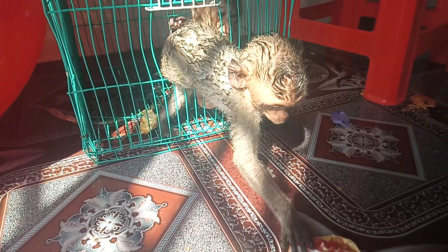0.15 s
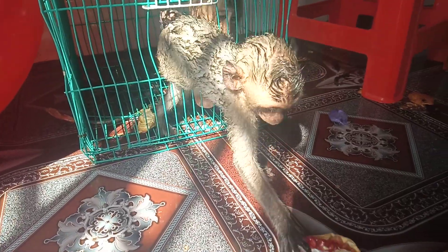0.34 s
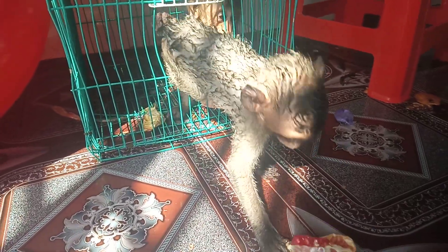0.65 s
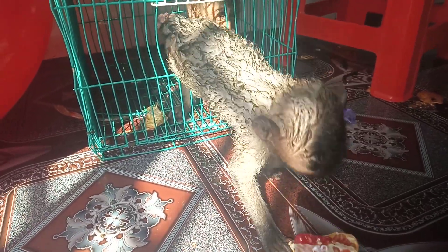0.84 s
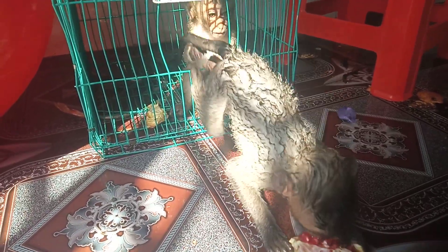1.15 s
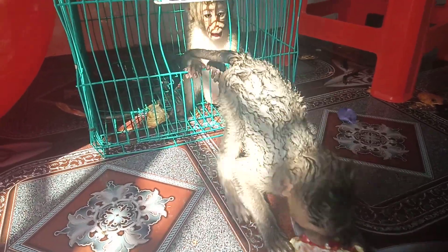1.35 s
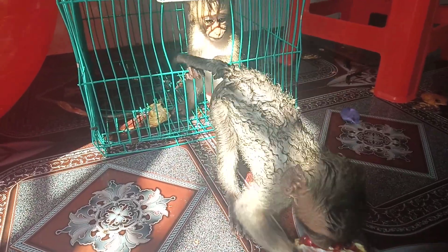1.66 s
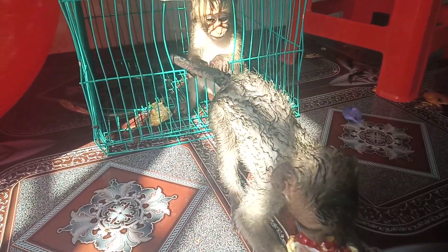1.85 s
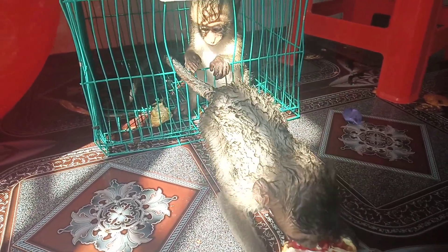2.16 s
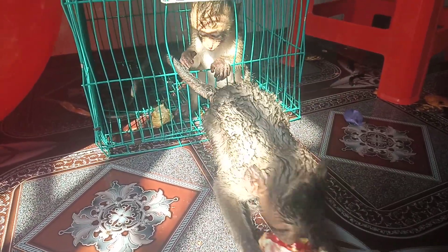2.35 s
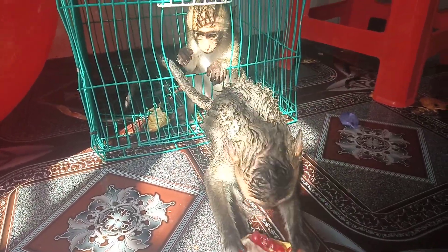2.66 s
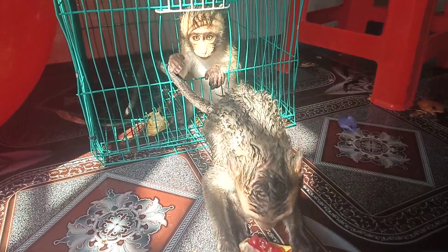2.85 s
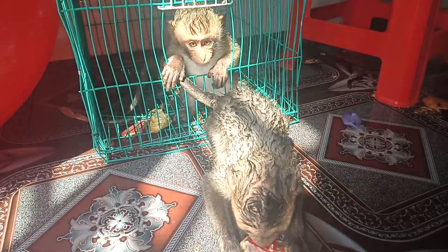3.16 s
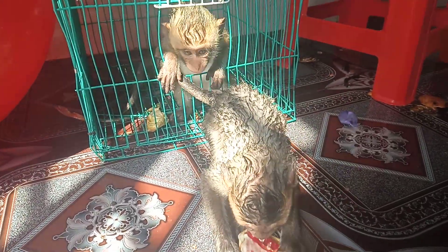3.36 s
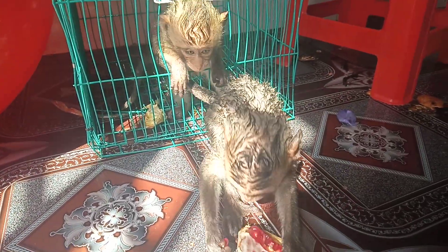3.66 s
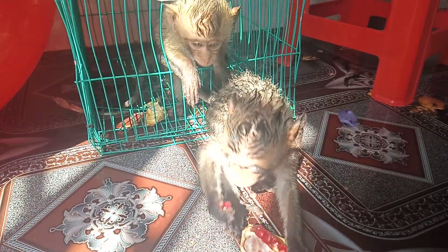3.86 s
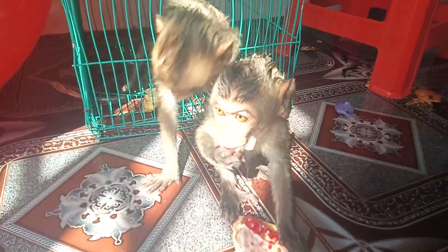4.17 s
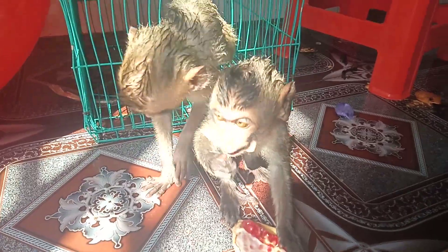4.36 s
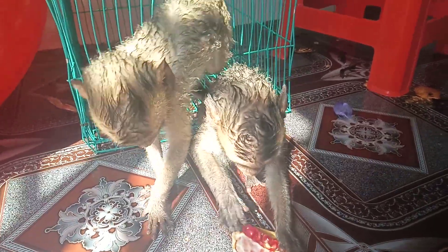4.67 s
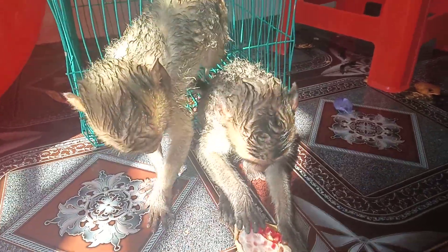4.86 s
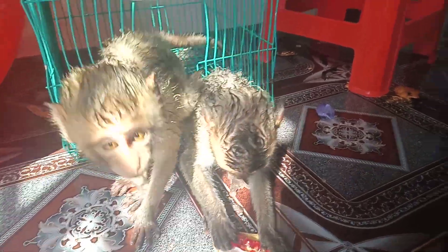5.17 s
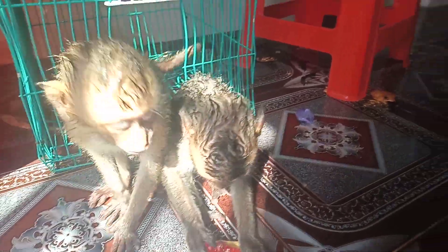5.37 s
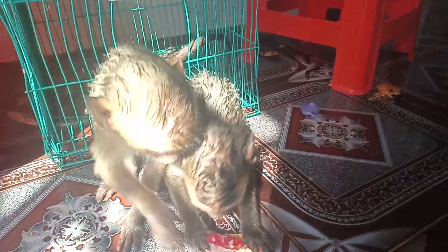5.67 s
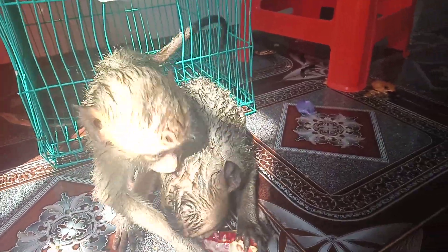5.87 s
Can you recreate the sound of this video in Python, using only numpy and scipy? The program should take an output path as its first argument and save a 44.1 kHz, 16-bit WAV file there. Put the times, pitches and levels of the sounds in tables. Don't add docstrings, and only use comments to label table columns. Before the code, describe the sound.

Close to a phone microphone in a hard tiled room, a young monkey's falling coo is already under way, then a call glides up and breaks into a loud whistled screech with echoes. Two softer coos follow with long pauses. Late on come two low hoarse yaps farther away, a thin whistle and a small knock. Faint claw and wire ticks and street hiss run underneath.

```python
import sys
import numpy as np
from scipy import signal
from scipy.fft import rfft, irfft, next_fast_len
from scipy.io import wavfile
from scipy.ndimage import uniform_filter1d, map_coordinates

SR = 44100
rng = np.random.default_rng(int(sys.argv[2]) if len(sys.argv) > 2 else 0)


def voltage_ratio(decibels):
    exponent = np.asarray(decibels, float) / 20
    return 10 ** exponent


def inscribe(sig):
    pcm = np.round(np.clip(np.atleast_2d(sig).T, -1, 1) * 32767)
    wavfile.write(sys.argv[1], SR, pcm.astype(np.int16))


N = 265041


def unit(x):
    return x / np.sqrt(np.mean(x ** 2) + 1e-20)


def along(points, hz):
    f, v = np.transpose(points)
    return np.interp(np.log(hz + 1), np.log(f + 1), v)


def wobble(n, rate):
    knots = rng.standard_normal(int(n * rate / SR) + 4)
    return map_coordinates(knots, [np.arange(n) * rate / SR])


def noise(spectrum):
    m = next_fast_len(N + 8192)
    gain = voltage_ratio(along(spectrum, np.fft.rfftfreq(m, 1 / SR)))
    return unit(irfft(rfft(rng.standard_normal(m)) * gain, m)[:N])


def surge(s, db, rise, fall):
    t = np.arange(N) / SR - s
    return db + np.where(t < 0, rise * t, -fall * t)


# first in seconds, last in seconds, spacing in seconds, depth in dB, half width in seconds.
CATCHES = [(.018, .018, 1, -12, .006), (.052, .135, .0207, -9, .0045), (1.146, 1.164, .018, -9, .003),
           (1.313, 1.322, .0042, -15, .0012), (2.449, 2.449, 1, -7, .004),
           (2.466, 2.564, .0325, -15, .0053), (3.515, 3.578, .063, -4, .0055), (4.515, 4.515, 1, -20, .009),
           (4.572, 4.66, .088, -9, .008)]


def voice(notes, tones, mouth, jitter, flutter_db, fade, count):
    out = np.zeros(N)
    catches = []
    for start, stop, every, depth_db, half in CATCHES:
        catches += [(at, depth_db, half) for at in np.arange(start, stop + every / 2, every)]
    for rows, (second_db, second_follows, third_db, third_follows, fourth_db) in zip(notes, tones):
        s, *cols = np.transpose(rows)
        begin = round(s[0] * SR)
        t = np.arange(begin, round(s[-1] * SR)) / SR
        hz, first, edge = (np.interp(t, s, c) for c in cols)
        first = first + sum(db * np.exp(-((t - at) / half) ** 2) for at, db, half in catches)
        sharper = edge - edge.mean()
        second = second_db + second_follows * sharper + along(mouth, 2 * hz)
        third = third_db + third_follows * sharper + along(mouth, 3 * hz)
        turns = np.cumsum(hz * (1 + jitter * wobble(len(t), 64.0))) / SR
        since = t - s[0] + (s[0] == 0)
        edges = np.clip(np.minimum(since, s[-1] - t) / fade, 0, 1)
        for k in range(1, count + 1):
            if k <= 3:
                db = (first, second, third)[k - 1]
            else:
                db = edge + along(mouth, k * hz) + (k == 4) * fourth_db
            drift_db = flutter_db * np.sqrt(k) * wobble(len(t), 23)
            breath = 1 + (k > 3) * .4 * wobble(len(t), 900)
            heard = voltage_ratio(db + drift_db) * breath * (k * hz < 15700)
            swing = np.sqrt(2) * np.sin(2 * np.pi * (k * turns + rng.random()))
            out[begin:][:len(t)] += edges * heard * swing
    return out


# time in seconds, pitch in Hz, loudness in dB,
# edge in dB (how sharply the vocal folds close).
COOS = [
    [(0, 820, -39.5, -61.5), (.03, 815.4, -32, -65.5), (.06, 790.5, -34, -69), (.09, 751, -40, -69),
     (.125, 741.5, -41, -76.5), (.15, 751, -32, -78)],
    [(2.415, 725, -41, -68), (2.43, 804, -35.5, -62), (2.458, 862, -31.5, -58.5),
     (2.5, 850.4, -34.5, -60.5), (2.548, 887, -31.5, -54.5), (2.585, 864, -38.5, -58),
     (2.615, 877.3, -36, -58), (2.635, 870, -42.5, -66), (2.668, 875, -36.5, -59.5)],
    [(3.425, 824, -41, -59.5), (3.445, 887, -32, -63.5), (3.48, 887, -31.5, -59.5),
     (3.515, 891.6, -30, -68.5), (3.54, 902.6, -27.5, -57), (3.595, 897, -34, -58.5),
     (3.655, 923.3, -31.5, -57), (3.675, 937.7, -43, -56), (3.708, 917, -33.5, -61)],
]
# second's mean in dB, its slope in dB per dB,
# third's mean in dB, its slope in dB per dB, lift of the fourth in dB.
COO_TONES = [(-44.5, 0.4, -51.5, 0.9, 3), (-46, -0.5, -48, 0.5, -4), (-49.5, 1.6, -43.5, 0, 2.5)]
# frequency in Hz, gain in dB.
THROAT = [(1500, 0), (3700, 0), (4500, -3), (5300, -15), (6300, -26), (7300, -31), (8350, -24), (9000, -35),
          (9900, -43), (11200, -34), (11700, -38), (12500, -54), (15000, -56)]


def coos():
    return voice(COOS, COO_TONES, THROAT, jitter=.002, flutter_db=.9, fade=.005, count=18)


# time in seconds, pitch in Hz, loudness in dB, edge in dB.
GLIDE = [
    [(1.083, 885, -40, -64), (1.1, 905, -26.5, -56), (1.122, 925, -24, -52), (1.148, 958, -29, -46),
     (1.17, 1045, -28, -47), (1.185, 1165, -30, -48), (1.2, 1315, -26, -42), (1.217, 1565, -22, -34),
     (1.234, 1750, -29, -32)],
]
# second in dB, dB per dB, third in dB, dB per dB, fourth's lift in dB.
GLIDE_TONES = [(-40.5, 0.33, -50, .2, 1)]
# frequency in Hz, gain in dB.
OPENING = [(1950, 0), (2330, 9), (2700, 0), (3500, 0), (3950, 5), (4600, -2), (5000, -20), (5500, -30),
           (6800, -17), (7500, -24), (8500, -31), (9800, -46), (11300, -46), (12600, -60), (14800, -38)]


def glide():
    return voice(GLIDE, GLIDE_TONES, OPENING, jitter=.002, flutter_db=.9, fade=.003, count=16)


# time in seconds, pitch in Hz, loudness in dB, edge in dB.
SCREECH = [
    [(1.233, 1850, -28, -58), (1.242, 2380, -25, -61), (1.254, 2520, -29, -65)],
    [(1.263, 2700, -22, -80), (1.285, 2650, -17, -80), (1.307, 2680, -23, -80)],
    [(1.309, 2800, -28, -45), (1.316, 2890, -24, -43), (1.325, 2830, -18, -46), (1.332, 2750, -26, -48)],
    [(1.336, 2700, -27, -75), (1.349, 2850, -23, -75)],
]
# second in dB, dB per dB, third in dB, dB per dB, fourth's lift in dB.
SCREECH_TONES = [(-56, 0, -48, 1.2, 0), (-62, 0, -64, 0, 0), (-38, 1.5, -45, 0, -3), (-58, 0, -58, 0, 0)]
SHRIEK = [
    [(1.348, 3050, -22, -45), (1.358, 2920, -15, -44), (1.363, 2910, -21, -50), (1.371, 3030, -11, -42),
     (1.375, 3050, -12, -32), (1.3785, 3080, -5.2, -27), (1.3825, 3080, -15, -30)],
    [(1.38, 2620, -15, -20), (1.39, 2380, -15, -24), (1.401, 2180, -18, -25)],
    [(1.402, 2100, -28, -53), (1.424, 1900, -33, -58)],
]
SHRIEK_TONES = [(-32.5, .2, -28, .25, 0), (-28, 4, -24, 1.9, 0), (-50, .8, -36, .9, 0)]
# frequency in Hz, gain in dB.
GAPE = [(3600, 0), (4700, -6), (5500, -26), (6800, -14), (8300, -22), (10000, -36), (11400, -24),
        (12600, -45), (14500, -30), (15500, -26)]


def screech():
    return voice(SCREECH, SCREECH_TONES, GAPE, jitter=.002, flutter_db=.3, fade=.002, count=7)


def shriek():
    return voice(SHRIEK, SHRIEK_TONES, GAPE, jitter=.002, flutter_db=.3, fade=.0016, count=7)


# frequency in Hz, level in dB per Hz.
RASP_COLOUR = [(2060, -38.5), (3500, 5), (4460, 8.5), (5280, -16.5), (6860, -16.5), (8910, 1.5),
               (10200, -42), (11100, -30), (12400, -33), (13900, -1.5), (15500, -22.5)]


def rasp():
    crack_s, hold_s = 1.38, .02
    burst_db = surge(crack_s, -35.5, 11000, 280)
    release_db = surge(crack_s + hold_s, 0, 0, 2200)
    return voltage_ratio(burst_db + release_db) * noise(RASP_COLOUR)


# time in seconds, pitch in Hz, loudness in dB, edge in dB.
YAPS = [
    [(4.8, 513, -42, -61), (4.82, 473.3, -43.5, -61), (4.845, 471.5, -39.5, -66.5), (4.9, 489, -55, -80)],
    [(4.918, 536, -41, -58), (4.93, 515.5, -35, -59.5), (4.945, 522, -46, -55.5), (4.957, 540, -36, -69),
     (4.966, 604, -44, -65)],
]
# second in dB, dB per dB, third in dB, dB per dB, fourth's lift in dB.
YAP_TONES = [(-50.5, 1.13, -55, .45, 0), (-41, 1, -57, -.2, 0)]


def far_yaps():
    yaps = voice(YAPS, YAP_TONES, THROAT, jitter=.02, flutter_db=1.2, fade=.007, count=4)
    return yaps * (1 + .3 * wobble(N, 300) + .12 * wobble(N, 5000))


# start in seconds, length in seconds, first pitch in Hz, last pitch in Hz, peak in dB.
FAR_TONES = [
    (4.46, 0.34, 1930, 1925, -50.5),
    (.14, 0.1, 468, 476, -55),
    (.29, .14, 463, 500, -55),
]


def far_tones():
    crest, swell_db, fade_db = 0.44, 7, 10.5
    notes = []
    for s, length, a, b, db in FAR_TONES:
        peak = (s + crest * length, (a + b) / 2, db, 0)
        notes.append([(s, a, db - swell_db, 0), peak, (s + length, b, db - fade_db, 0)])
    no_overtones = np.zeros((len(notes), 5))
    pure = voice(notes, no_overtones, THROAT, jitter=0.0045, flutter_db=2, fade=.01, count=1)
    return pure * (1 + 0.26 * wobble(N, 60))


# start in seconds, peak in dB, pitch in Hz.
TICKS = [(0.2635, -61, 6380), (0.2887, -60, 8070), (0.98, -58, 7330), (1.077, -55.5, 7800),
         (2.2218, -70, 6940), (2.6738, -65, 7300), (2.8893, -68, 7000), (3.5169, -51, 7400),
         (3.6794, -59, 6510), (3.7632, -58, 7000), (4.1713, -68, 6410), (4.18, -60, 7660),
         (4.4947, -69, 7520), (5.2021, -66, 6170), (5.3637, -63, 6690), (5.6665, -68, 6030),
         (5.714, -66, 7170), (5.8316, -64, 6260)]
# start in seconds, peak in dB, pitch in Hz, pitch spread as a share, decay t60 in seconds.
RUSTLES = [
    (0.299, -55, 2800, 0.16, .03),
    (2.272, -61, 4530, 0.25, .06),
    (2.283, -69, 7350, 0.13, 0.055),
    (3.555, -49, 3200, 0.22, .02),
    (3.577, -57, 11000, 0.32, 0.014),
    (4.815, -48, 3000, 0.29, 0.075),
    (4.926, -56, 2800, 0.37, .07),
    (4.992, -35, 2440, .1, .015),
    (5.058, -67, 7400, .55, .06),
    (5.072, -67, 7450, 0.35, .05),
]


def ticks():
    out = np.zeros(N + SR)
    t = np.arange(4096) / SR
    hz = np.fft.rfftfreq(len(t), 1 / SR) + 1
    contacts = [(*tick, 0.12, .015) for tick in TICKS]
    contacts += [tuple(rustle) for rustle in RUSTLES]
    for s, db, centre_hz, spread, t60 in contacts:
        colour = np.exp(-(np.log(hz / centre_hz) / spread) ** 2 / 2)
        grit = unit(irfft(rfft(rng.standard_normal(len(t))) * colour))
        onset = 1 - np.exp(-40 * t / t60)
        out[round(s * SR):][:len(t)] += voltage_ratio(db - 4.5 - 60 * t / t60) * onset * grit
    return out[:N]


# delay in seconds, level in dB.
WALLS = [
    (.017, -17),
    (.037, -14),
    (.051, -13.5),
]


def walls(x):
    echoes = sum(voltage_ratio(db) * np.pad(x, (round(s * SR), 0))[:N] for s, db in WALLS)
    return uniform_filter1d(echoes, size=5)


# frequency in Hz, level in dB.
ECHO_COLOUR = [(400, -1.5), (950, -2), (1600, -5.5), (2200, -4.5), (3050, 1), (4300, -2.5), (5300, -14),
               (6500, -4.5), (9000, -5), (10200, -8), (15000, -8.5)]
# frequency in Hz, t60 in seconds.
ROOM = [(400, 0.46), (1000, 0.69), (3000, 0.6), (7000, 0.48), (14000, 0.22)]


def room(x, gap):
    hz, t, z = signal.stft(rng.standard_normal(SR), SR, nperseg=256)
    decay_db = along(ECHO_COLOUR, hz)[:, None] - 60 * t / along(ROOM, hz)[:, None]
    tail = signal.istft(z * voltage_ratio(decay_db), SR, nperseg=256)[1]
    delayed = np.pad(x, (round(gap * SR), 0))
    return signal.fftconvolve(delayed, tail / np.linalg.norm(tail))[:N]


# frequency in Hz, level in dB per Hz.
HISS = [(15, -52), (25, -36.5), (82, -2), (129, -6), (195, 2), (310, -7), (356, -3.5), (394, -7),
        (605, -3.5), (648, 1.5), (852, -5.5), (928, -2.5), (1500, -7), (1950, -40.5), (3300, -120)]
# frequency in Hz, level in dB per Hz.
FIZZ = [(880, -31.5), (1500, -4.5), (1640, 0), (1840, -2.5), (1990, -2), (2810, -5), (3360, -7.5),
        (4250, -16), (5430, -38.5), (7300, -36), (8970, -49), (14800, -50), (15700, -52)]


def street():
    z = signal.stft(noise(HISS) + voltage_ratio(-4.5) * noise(FIZZ), nperseg=512)[2]
    patches = uniform_filter1d(uniform_filter1d(rng.standard_normal(z.shape), 5, 0), 12, 1)
    hiss = signal.istft(z * voltage_ratio(1.5 * unit(patches)), nperseg=512)[1][:N]
    settle_s = 0.65
    level_db = -49 + 2.5 * np.exp(-np.arange(N) / SR / settle_s)
    return voltage_ratio(level_db) * unit(hiss)


# peak in seconds, level in dB, rise in dB per second, fall in dB per second.
MOTOR = [
    (.3, -61, 45, 18),
    (.74, -62, -5, 560),
    (1.1, -61.5, 100, 450),
]
# frequency in Hz, level in dB per Hz.
DRONE = [(30, -4), (55, 32), (72, 10.5), (94, -27.5), (130, -21.5), (400, -120)]


def motor():
    level_db = np.max([surge(*row) for row in MOTOR], axis=0)
    return voltage_ratio(level_db) * noise(DRONE)


def background(loud):
    duck = 1 / (1 + uniform_filter1d(np.abs(loud), size=1300) / 0.25)
    return duck * (street() + motor())


def scene():
    soft = coos() + glide() + screech()
    loud = shriek() + rasp()
    yaps, clicks = far_yaps(), ticks()
    filled = voltage_ratio(np.interp(np.arange(N) / SR, [0, .008, .05], [-30, 5, 0]))
    sent = soft * filled + voltage_ratio(2.5) * loud
    calls = soft + loud + walls(soft + voltage_ratio(5.0) * loud) + voltage_ratio(-11.5) * room(sent, gap=.008)
    far = yaps + voltage_ratio(-14) * room(yaps, gap=0.00382) + far_tones()
    cage = clicks + voltage_ratio(-12.0) * room(clicks, gap=0.0044)
    return (calls + far + cage + background(calls))[None]


def band_limit(x):
    return signal.sosfilt(signal.butter(12, 16050, fs=SR, output="sos"), x)


def record(dry):
    mix = dry + voltage_ratio(-86) * rng.standard_normal(dry.shape)
    return band_limit(mix)


dry = scene()
out = record(dry)
inscribe(out)
```